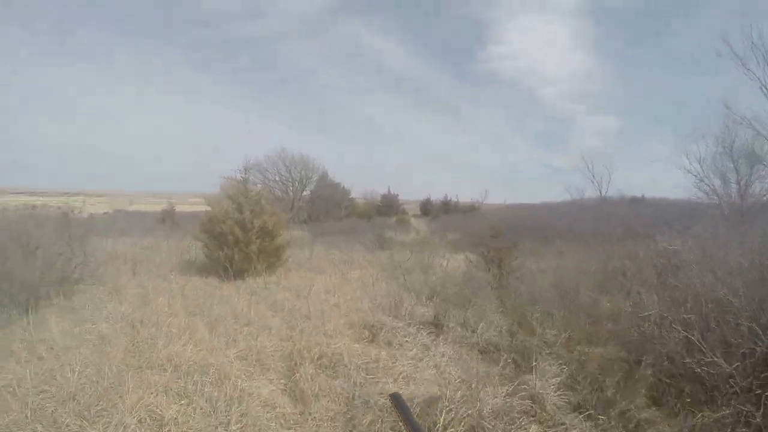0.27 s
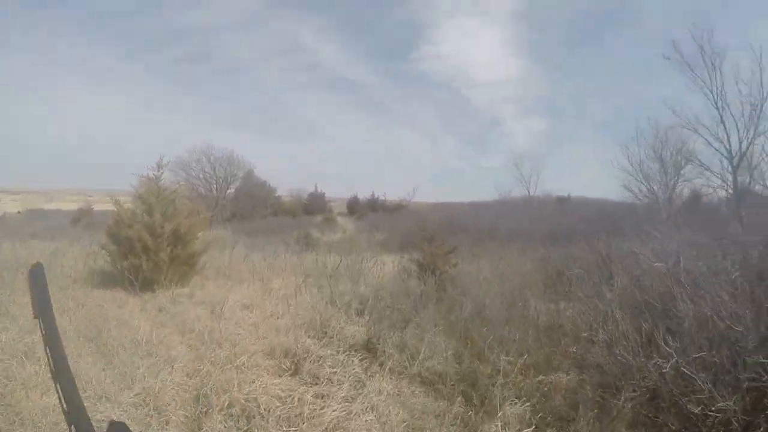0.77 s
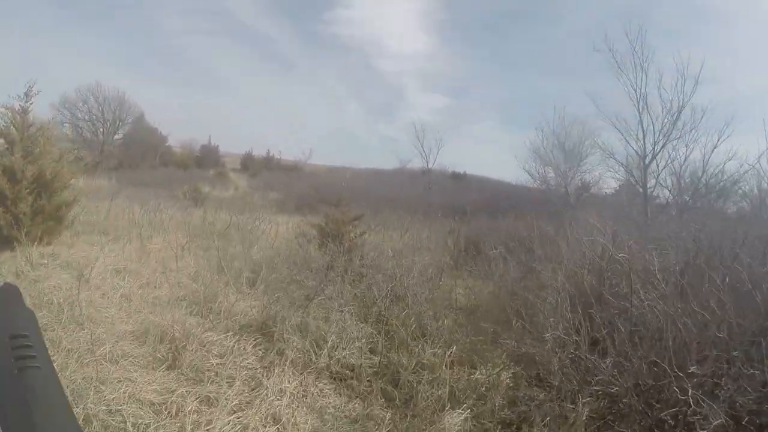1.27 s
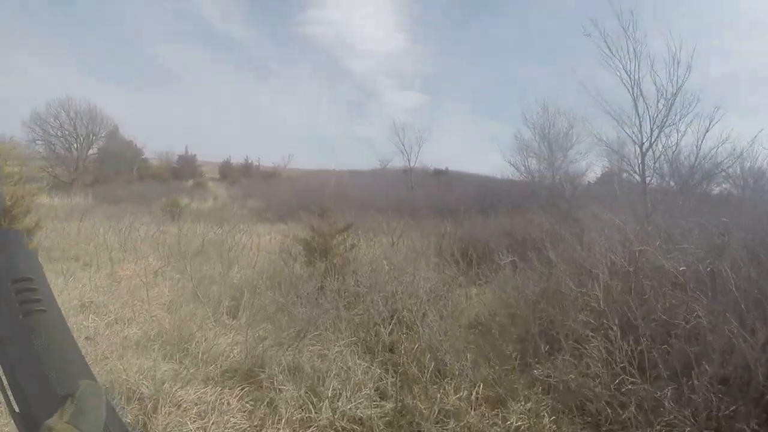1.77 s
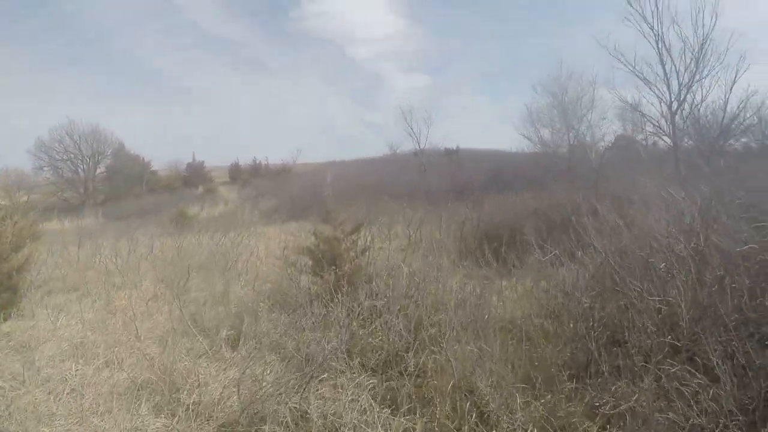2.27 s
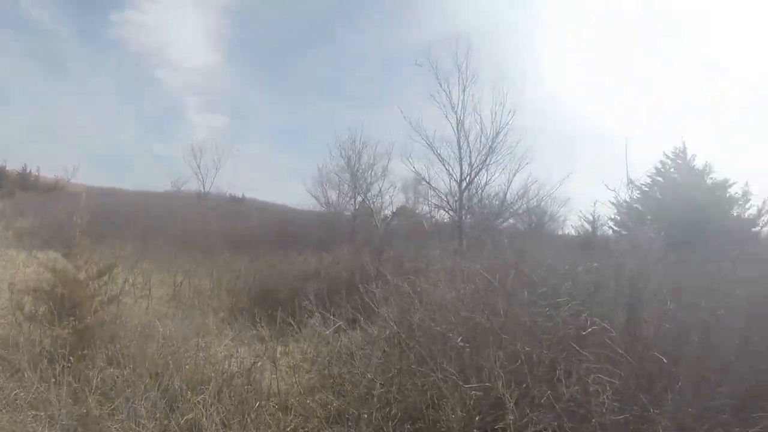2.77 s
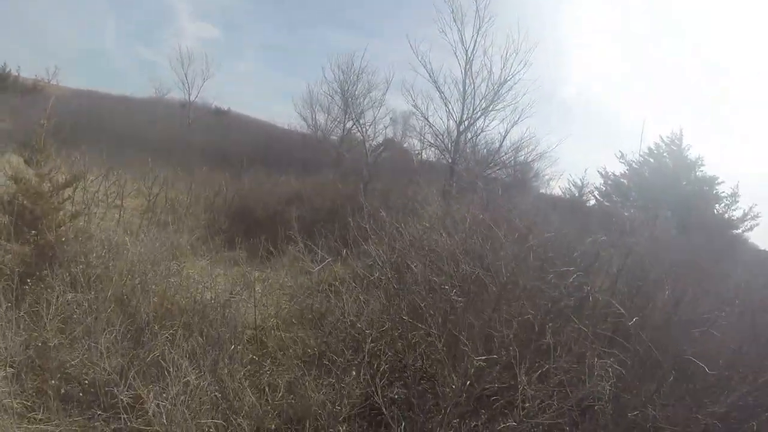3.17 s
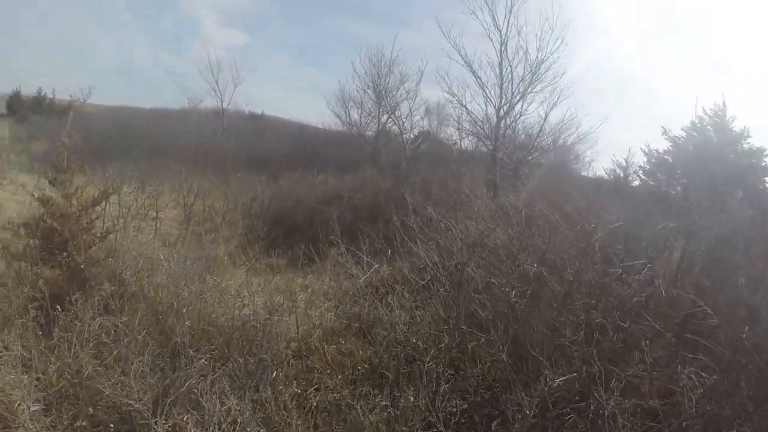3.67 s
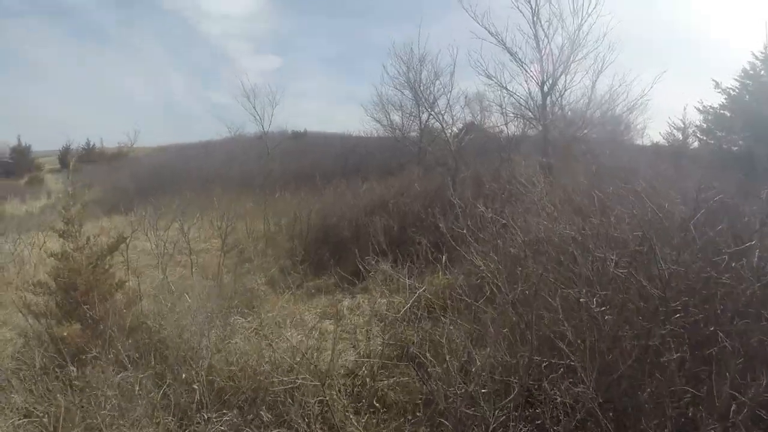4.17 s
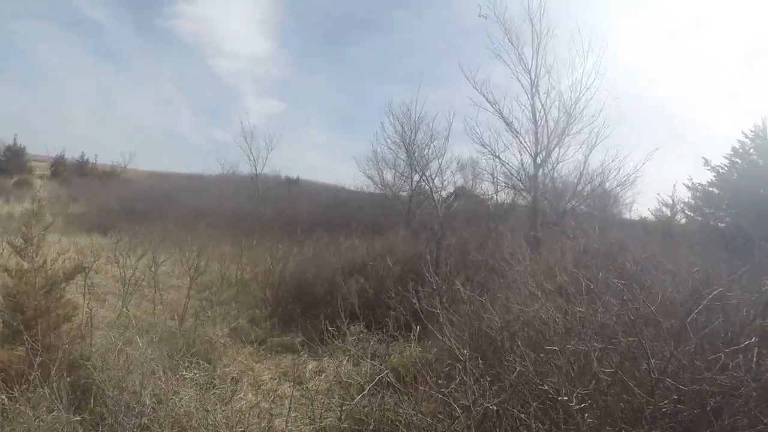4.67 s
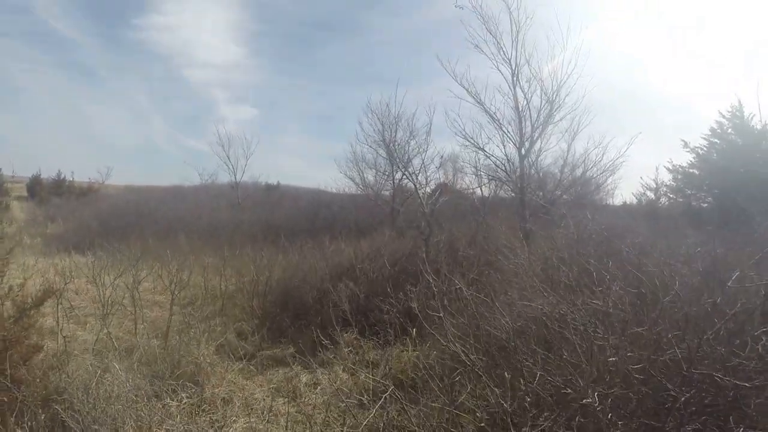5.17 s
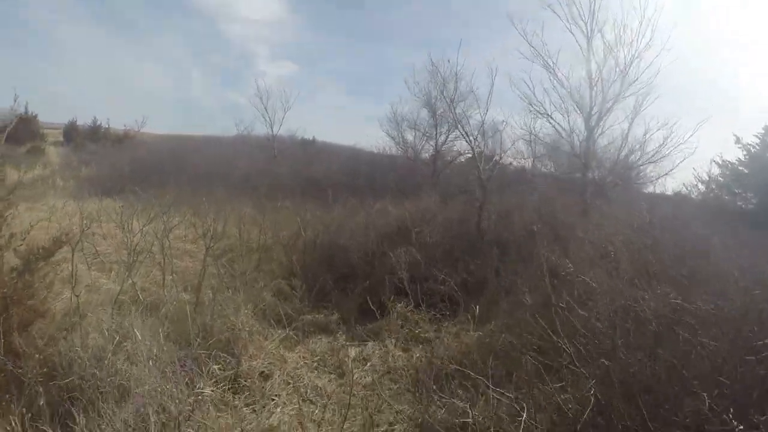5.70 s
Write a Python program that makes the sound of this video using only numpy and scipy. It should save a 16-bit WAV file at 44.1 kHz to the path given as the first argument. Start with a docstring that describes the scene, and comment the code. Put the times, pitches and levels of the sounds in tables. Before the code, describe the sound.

Wind buffets a small head-worn microphone from the start, a low, uneven rumble with flutter and dull thumps, strongest around 0.5, 1 and 1.8 to 2.6 seconds. Beneath it a person walks through tall dry grass, with soft irregular swishes against the legs, muffled clothing scuffs and small knocks of gear. The sharpest clack comes at about 0.6 seconds, with more near 1.3 and 2.2 seconds, where a stem also scrapes faintly. A strap gives one tiny squeak at about 3.4 seconds as the wind slackens. From 3.7 seconds the grass rustles more continuously. After 4.3 seconds the deep rumble fades, leaving a lighter fluttering rush with soft pops, and dry stalks crunch and snap close by from 4.5 seconds until the end near 6 seconds. Everything sounds slightly boxy, over a faint steady hiss.

```python
"""Wind buffets and flutters at a microphone port as a walker pushes through tall dry grass in a field.
Turbulent eddies rumble, rush, thump and pop at the port of a small head-worn camera in a closed case.
Stems swish, scrape and snap, exciting the resonances of the case; clothing scuffs and knocks, dulled by
the mount, and a strap squeaks once by stick-slip friction.
Under it all lies the faint hiss of the electronics with a few narrow whistles."""
import sys
import numpy as np
from scipy import signal
from scipy.fft import rfft, irfft
from scipy.io import wavfile

SR = 44100
rng = np.random.default_rng(int(sys.argv[2]) if len(sys.argv) > 2 else 0)


def transcribe(signal):
    """Save signal, clipped to [-1, 1], as a 16-bit WAV file at the path in sys.argv[1]."""
    frames = np.atleast_2d(signal).T
    limited = np.clip(frames, -1, 1)
    pcm = np.round(limited * 32767).astype(np.int16)
    wavfile.write(sys.argv[1], SR, pcm)


N = 261954


def from_db(db):
    """Amplitude ratio of a level."""
    return 10 ** (np.asarray(db) / 20)


def rms_one(x):
    """Normalisation to unit power."""
    return x / np.sqrt(np.mean(x ** 2) + 1e-20)


def in_time(rows):
    """Linear interpolation of each column against the first, one value a sample."""
    times, *columns = np.transpose(rows)
    return [np.interp(np.arange(N) / SR, times, column) for column in columns]


def drift(rate):
    """Low-pass random process of rms 1, changing about rate times a second."""
    step, settle = 40, 2000
    r = np.exp(-2 * np.pi * rate * step / SR)
    slow = signal.lfilter([1], [1, -2 * r, r * r], rng.standard_normal(N // step + settle + 2))[settle:]
    return np.interp(np.arange(N) / step, np.arange(len(slow)), rms_one(slow))


def shaped_noise(spectrum):
    """Spectral shaping of white noise, -80 dB outside the given band; rms 1."""
    hz, db = np.transpose(spectrum)
    grid = np.maximum(np.arange(N // 2 + 1) * SR / N, 1)
    gain = from_db(np.interp(np.log(grid), np.log(hz), db, left=-80, right=-80))
    return rms_one(irfft(rfft(rng.standard_normal(N)) * gain, N))


def resonate(x, modes):
    """Modal superposition: damped resonators in parallel, with alternating signs."""
    out = 0
    for k, (hz, width, db) in enumerate(modes):
        r = np.exp(-np.pi * width / SR)
        b = [(1 - r * r) / 2, 0, (r * r - 1) / 2]
        a = [1, -2 * r * np.cos(2 * np.pi * hz / SR), r * r]
        out = out + (-1) ** k * from_db(db) * signal.lfilter(b, a, x + 1e-18)
    return out


def grains(per_s, spread_db):
    """Shot noise: clicks of uneven size, clumped by a wandering rate; rms 1."""
    sizes = from_db(spread_db * np.minimum(rng.exponential(1, N), 5)) * rng.choice([-1, 1], N)
    born = rng.random(N) < per_s * from_db(3.0 * drift(25)) / SR
    return rms_one(sizes * born)


def struck(times, peaks_db, modes, decay_s, puff):
    """Impulse excitation: a click and a dying puff of noise ring the modes, in a new balance each blow."""
    favour_db = rng.normal(0, 1.48, (len(times), len(modes)))
    noise, out = rng.standard_normal(N), 0
    for k, mode in enumerate(modes):
        clicks = np.zeros(N)
        clicks[(np.asarray(times) * SR).astype(int)] = from_db(peaks_db + favour_db[:, k])
        puffs = signal.lfilter([1], [1, -np.exp(-1 / (decay_s * SR))], clicks + 1e-18) * noise
        out = out + (-1) ** k * resonate(clicks + puff * puffs, [mode])
    click_peak = np.abs(resonate(signal.unit_impulse(SR // 10), modes)).max()
    return out / click_peak


def soften(x, cut_hz):
    """Low-pass transmission: a soft contact or a padded path passes no treble."""
    return signal.sosfilt(signal.butter(4, cut_hz, fs=SR, output="sos"), x)


def strokes(starts, holds, levels_db, fades_db_per_s, rise_db_per_s, bed_db):
    """Incoherent addition: amplitude of strokes that rise, hold and fade over a steady bed."""
    t, power = np.arange(0, N + 32, 32) / SR, from_db(2 * bed_db)
    for start, hold, db, fade in zip(starts, holds, levels_db, fades_db_per_s):
        loss_db = rise_db_per_s * np.maximum(start - t, 0) + fade * np.maximum(t - start - hold, 0)
        power = power + from_db(2 * (db - loss_db))
    return from_db(np.interp(np.arange(N) / SR, t, 10 * np.log10(power)))


# Spectra of large, middle-sized and small eddies: f/Hz, relative level/dB
BUFFET_SPECTRUM = [(8.8, -61), (15, 4), (44, 3), (200, -12.5), (260, -14.5), (440, -120)]
RUMBLE_SPECTRUM = [(70, -11), (110, 3.5), (170, -2), (230, -18), (320, -36)]
FLUTTER_SPECTRUM = [(150, -26.5), (200, -1.5), (270, 1.5), (340, 0), (520, -17), (680, -43)]
# Wind at the port, before the swells: t/s, buffet level/dB, flutter level/dB
WIND_LEVELS = [(0.0, -50, -38), (0.08, -27, -46.5), (0.28, -29.5, -47), (0.36, -35, -40.5),
               (0.5, -20.5, -35), (0.64, -38, -42), (0.78, -25, -43.5), (1.0, -18.5, -38.5),
               (1.28, -34.5, -43.5), (1.4, -26, -41), (1.62, -28.5, -43), (1.82, -19, -32.5),
               (2.13, -21.5, -33), (2.4, -23, -42.5), (2.75, -28, -40), (3.14, -24.5, -37),
               (3.23, -29, -45), (3.75, -33, -45.5), (4.1, -28, -37), (4.3, -33.5, -39.5),
               (4.83, -45.5, -33.5), (5.5, -51, -32.5), (5.94, -46, -38.5)]


def turbulence(swell_rise_s=0.02, swell_fall_s=0.035):
    """Turbulent pressure fluctuation: eddies of three sizes buffet, rumble and flutter at the port."""
    t = np.arange(N) / SR
    buffet_db, flutter_db = in_time(WIND_LEVELS)
    for time, _, buffet_swell_db, flutter_swell_db in EDDY_IMPACTS:  # swell or dip around each thump
        swell = np.interp(t, [time - swell_rise_s, time, time + swell_fall_s], [0, 1, 0])
        buffet_db += buffet_swell_db * swell
        flutter_db += flutter_swell_db * swell
    rumble_db = (buffet_db + flutter_db) / 2 - 8.5
    lumps, bumps, flicker = drift(3.3), drift(12.4), drift(50.0)
    buffet = rms_one(shaped_noise(BUFFET_SPECTRUM) * from_db(0.56 * lumps + 1.52 * bumps))
    flutter = rms_one(shaped_noise(FLUTTER_SPECTRUM) * from_db(2.6 * flicker + 0.89 * bumps))
    rumble = rms_one(shaped_noise(RUMBLE_SPECTRUM) * from_db(0.94 * lumps + 1.2 * bumps + 2.6 * flicker))
    return from_db(buffet_db) * buffet + from_db(rumble_db) * rumble + from_db(flutter_db) * flutter


# Resonances of the rushing air: f/Hz, bandwidth/Hz, gain per pass/dB
RUSH_MODES = [(491, 170, -0.5), (724.5, 92, 2), (786.7, 75, -1.5)]
# Flow past the port edge: t/s, level/dB
RUSH_LEVELS = [(0.0, -49), (0.35, -56), (0.51, -43), (0.76, -52.5), (1.62, -55), (1.98, -47.5),
               (2.71, -53.5), (2.98, -46.5), (3.37, -62.5), (3.67, -58), (3.99, -46), (4.37, -49),
               (4.6, -43.5), (5.94, -47)]


def edge_rush():
    """Flow noise: air passing the port edge sounds in narrow, flickering bands."""
    (level_db,) = in_time(RUSH_LEVELS)
    bands = resonate(resonate(rng.standard_normal(N), RUSH_MODES), RUSH_MODES)  # twice, for steep skirts
    return from_db(level_db) * rms_one(bands * from_db(1.3 * drift(50.0) + 3.55 * drift(143)))


# Spectrum of the circuit noise: f/Hz, relative level/dB
HISS_SPECTRUM = [(530, -45), (900, 1), (2360, -3.5), (4260, -6.5), (5080, -7.5), (5710, -10),
                 (7400, -14), (10300, -19), (15000, -29)]
# Whistles of the circuit: f/Hz, bandwidth/Hz, level/dB
WHISTLE_BANDS = [(5064, 280, -71.5), (10010, 320, -77.5)]


def electronics(hiss_db=-63.5, whine_hz=12647, whine_db=-89.5):
    """Electronic self-noise: broadband hiss, a pure whine and two narrow-band whistles."""
    out = from_db(hiss_db) * shaped_noise(HISS_SPECTRUM)
    out += from_db(whine_db) * np.sin(2 * np.pi * whine_hz * np.arange(N) / SR)
    for hz, width, db in WHISTLE_BANDS:
        mode = [(hz, width, 0)]
        out += from_db(db) * rms_one(resonate(resonate(rng.standard_normal(N), mode), mode))
    return out


MOUNT_CUT_HZ = 2900
# Resonances of the mount: f/Hz, bandwidth/Hz, gain/dB
MOUNT_MODES = [(619.6, 51.4, 7.5), (1032, 42, 5), (1285, 2040, -9.5), (2400, 253, -2.5), (2697, 100, -7),
               (3553, 70, -4.5), (1300, 51, -18.5)]
# Cloth rubbing the mount: t/s, hold/s, level before the low-pass/dB, fade/(dB/s)
CLOTH_STROKES = [(0.047, 0.032, -44.5, 83), (0.253, 0.21, -46.5, 200), (0.515, 0.011, -35.5, 502),
                 (0.596, 0.011, -35.5, 347), (0.922, 0.02, -44.5, 53), (1.312, 0.0072, -39, 205),
                 (1.731, 0.21, -47.5, 46), (2.02, .01, -49.5, 94), (2.289, 0.19, -48.5, 64),
                 (2.848, 0.053, -48.5, 57), (4.456, 0.18, -53.5, 26), (5.771, 0.024, -44.5, 250)]


def cloth_scuffs():
    """Structure-borne sound: the friction of cloth comes dull through the mount."""
    envelope = strokes(*np.transpose(CLOTH_STROKES), rise_db_per_s=344, bed_db=-59.5)
    friction = rms_one(resonate(grains(per_s=2500, spread_db=1.0), MOUNT_MODES))
    return soften(envelope * friction, MOUNT_CUT_HZ)


# Resonances of the closed case: f/Hz, bandwidth/Hz, gain/dB
CASE_MODES = [(2054, 140, 8.5), (2322, 128, 12), (3906, 257, 7), (4760, 130, -1), (6020, 510, -3.5),
              (8130, 270, -3.5), (9700, 3100, -15), (11600, 5700, -18), (14000, 700, -22)]
# Legs sweeping the grass: t/s, hold/s, swish level/dB, rasp level/dB, tip level/dB, fade/(dB/s)
LEG_SWEEPS = [(0.058, 0.045, -57.5, -84, -83, 66), (0.318, 0.12, -52.5, -64, -69.5, 142),
              (0.488, 0.045, -56, -80, -87, 400), (0.67, 0.15, -62, -86, -107, 82),
              (0.922, 0.25, -63, -75, -80, 300), (1.322, 0.034, -57.5, -84, -78, 140),
              (1.819, 0.16, -52, -59, -63.5, 200), (2.04, 0.13, -60, -72.5, -86, 71),
              (2.342, 0.19, -68, -94, -94, 62), (2.84, 0.13, -62.5, -84, -76, 41),
              (3.683, 0.24, -62.5, -64.5, -69, 40), (3.793, 0.31, -56.5, -65.5, -74.5, 35),
              (4.468, 0.26, -53, -82, -78, 64), (4.935, 0.11, -56, -72, -71.5, 42),
              (5.248, 0.14, -56.5, -65, -66.5, 14), (5.503, 0.258, -53.5, -64, -65.5, 298)]


def grass_swish():
    """Forced vibration: stems drive the low case modes, rasping blades the middle, thin tips the top."""
    low, middle, high = CASE_MODES[:5], CASE_MODES[4:6], CASE_MODES[6:]
    brushing = resonate(grains(per_s=7000, spread_db=0), low)
    # single stalks crackle in one mode at a time
    crackle = sum(from_db(0.5 * drift(32)) * resonate(grains(per_s=240, spread_db=5.5), [mode])
                  for mode in low)
    tufts = from_db(1.15 * drift(16))
    swish = rms_one(tufts * (brushing + from_db(-4) * crackle))
    fine, sparse = grains(per_s=22000, spread_db=3.5), grains(per_s=180, spread_db=3.5)
    rasp = rms_one(resonate(fine, middle))
    tips = rms_one(resonate(fine + from_db(-10) * sparse, high))
    start, hold, swish_db, rasp_db, tips_db, fade = np.transpose(LEG_SWEEPS)
    return (swish * strokes(start, hold, swish_db, fade, rise_db_per_s=143, bed_db=-77.5)
            + rasp * strokes(start, hold, rasp_db, fade, rise_db_per_s=224, bed_db=-87)
            + tips * strokes(start, hold, tips_db, fade, rise_db_per_s=224, bed_db=-80.5))


# Resonances of the diaphragm: f/Hz, bandwidth/Hz, gain/dB
DIAPHRAGM_MODES = [(77, 85, 3.5), (200, 213, -1.5)]
# Large eddies hitting the port: t/s, drive level/dB, buffet swell/dB, flutter swell/dB
EDDY_IMPACTS = [(0.092, -35, 3, 14.5), (0.175, -46, 7.5, 14), (0.275, -38, 10, 9.5), (0.506, -17, 10, 6),
                (0.756, -25, 12.5, 10.5), (0.938, -18, 3, 9), (1.114, -18.5, 2, -11), (1.201, -22, 5.5, -4),
                (1.553, -19, 15, 16.5), (1.679, -26.5, 5.5, -22), (1.781, -14, 2.5, 5),
                (1.964, -13.5, -1, 9), (2.048, -14, -5, -6), (2.177, -12, -3, -6),
                (2.571, -13.5, 9.5, 13.5), (2.774, -29.5, 3, -7), (2.893, -34, 5.5, 5), (3.038, -43, 8, 4),
                (3.13, -22.5, 4, -15), (3.742, -50, 8.5, -5)]


def eddy_thumps():
    """Heavily damped response: each large eddy gives the diaphragm a pressure pulse."""
    times, drive_db, _, _ = np.transpose(EDDY_IMPACTS)
    return soften(struck(times, drive_db, DIAPHRAGM_MODES, decay_s=0.0071, puff=0.066), cut_hz=345)


# Stems and gear hitting clothing: t/s, clack drive level/dB, thud drive level/dB
GEAR_IMPACTS = [(0.583, -30.5, -38), (0.6056, -19.5, -30), (0.621, -38, -29.5), (0.9294, -38, -32.5),
                (1.2485, -31.5, -45), (1.2941, -26, -33), (1.329, -43, -30), (1.7914, -29.5, -33),
                (2.0513, -33, -46), (2.2188, -32.5, -41), (2.2564, -32.5, -33.5), (2.319, -45, -26),
                (2.3504, -62, -31.5), (2.6216, -34, -42), (2.7924, -59, -32), (2.8676, -31.5, -36),
                (2.9376, -36, -35), (3.0422, -60, -31.5), (3.7595, -32.5, -31.5), (4.0412, -35.5, -37),
                (4.13, -34.5, -37), (4.385, -33.5, -44), (4.5084, -54, -33.5), (4.7058, -34, -29.5),
                (4.9373, -56, -35), (5.2528, -33, -54), (5.613, -67, -29.5), (5.6449, -32.5, -28.5),
                (5.7263, -38, -39)]


def gear_knocks():
    """Impact excitation: a blow thuds in the lowest mode of the mount and clacks in the upper ones."""
    times, clack_db, thud_db = np.transpose(GEAR_IMPACTS)
    thuds = soften(struck(times, thud_db, MOUNT_MODES[:1], decay_s=0.005, puff=0.034), cut_hz=1230)
    clacks = struck(times, clack_db, MOUNT_MODES[2:], decay_s=0.0044, puff=0.11)
    return soften(thuds + clacks, MOUNT_CUT_HZ)


# Thin tips cracking close by: t/s, body level/dB, bright edge level/dB
TIP_FRACTURES = [(2.017, -43, -46), (4.655, -44, -50), (5.225, -40, -42), (5.284, -45, -45),
                 (5.436, -58, -48), (5.47, -48.5, -37), (5.531, -44, -46), (5.556, -44, -45),
                 (5.612, -49, -44), (5.746, -44, -47)]


def tip_snaps():
    """Brittle fracture: a breaking tip sends out a click that rings the upper modes of the case."""
    times, body_db, edge_db = np.transpose(TIP_FRACTURES)
    body = struck(times, body_db, CASE_MODES[2:6], decay_s=0.0026, puff=0.24)
    edge = struck(times, edge_db, CASE_MODES[7:], decay_s=0.004, puff=0.32)
    return body + edge


# A stiff stem dragging along the leg: t/s, hold/s, level/dB, fade/(dB/s)
STEM_DRAGS = [(2.144, 0.11, -64.5, 150)]


def stem_scrape():
    """Sliding friction: dense tiny contacts drive a single mode of the case."""
    envelope = strokes(*np.transpose(STEM_DRAGS), rise_db_per_s=143, bed_db=-87)
    return envelope * rms_one(resonate(grains(per_s=22000, spread_db=3.5), CASE_MODES[2:3]))


# Resonances of the strap: f/Hz, bandwidth/Hz, gain/dB
STRAP_MODES = [(650, 66, 8), (1300, 640, -10.5), (2640, 200, -4)]


def strap_squeak(start_s=3.35, length_s=0.044, ramp_s=0.0052, slip_hz=710, jitter=0.063, level_db=-44):
    """Stick-slip oscillation: a jittered train of uneven slips rings the strap."""
    cycles = np.cumsum(slip_hz * (1 + jitter * drift(160)) / SR)
    slips = np.diff(np.floor(cycles), prepend=0) * from_db(4.5 * rng.standard_normal(N))
    corners_s = start_s + np.array([0, ramp_s, length_s - ramp_s, length_s])
    envelope = from_db(level_db) * np.interp(np.arange(N) / SR, corners_s, [0, 1, 1, 0])
    return envelope * rms_one(resonate(slips, STRAP_MODES))


# Dry stalks breaking underfoot: t/s, level/dB
STALK_FRACTURES = [(4.515, -46), (4.5502, -39.5), (4.619, -47.5), (4.674, -42), (5.058, -44.5),
                   (5.1287, -55), (5.1581, -51), (5.3797, -45), (5.402, -46), (5.7183, -51),
                   (5.7832, -42.5)]


def stalk_crunches():
    """Fracture under load: a crushed stalk's burst of noise rings the lowest modes of the case."""
    return struck(*np.transpose(STALK_FRACTURES), CASE_MODES[:3], decay_s=0.011, puff=0.15)


# Resonances of the port: f/Hz, bandwidth/Hz, gain/dB
PORT_MODES = [(305, 180, 13), (600, 470, -5)]
# Single eddies at the port: t/s, drive level/dB
EDDY_PULSES = [(4.658, -23.5), (4.689, -21), (4.745, -22), (5.293, -28), (5.366, -23), (5.72, -18)]


def eddy_pops():
    """Transient response: the pressure pulse of a single eddy briefly rings the port."""
    return soften(struck(*np.transpose(EDDY_PULSES), PORT_MODES, decay_s=0.0037, puff=0.15), cut_hz=587)


def scene():
    """Linear superposition: all sources add at one microphone."""
    wind = turbulence() + edge_rush() + eddy_thumps() + eddy_pops()
    clothing = cloth_scuffs() + gear_knocks() + strap_squeak()
    grass = grass_swish() + tip_snaps() + stem_scrape() + stalk_crunches()
    return (wind + electronics() + clothing + grass)[None]


def record(dry):
    """Band limiting: a steep elliptic low-pass removes the highest treble."""
    cutoff_hz = 15250
    return signal.sosfilt(signal.ellip(10, .5, 70, cutoff_hz, fs=SR, output="sos"), dry)


dry = scene()
out = record(dry)
transcribe(out)
```